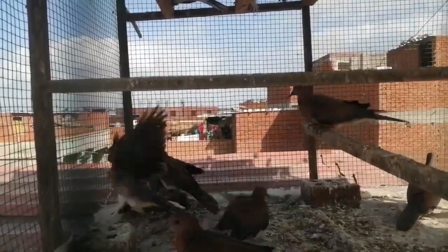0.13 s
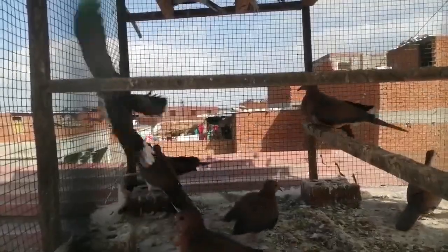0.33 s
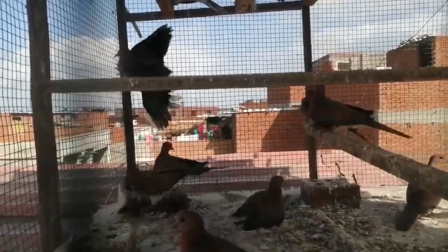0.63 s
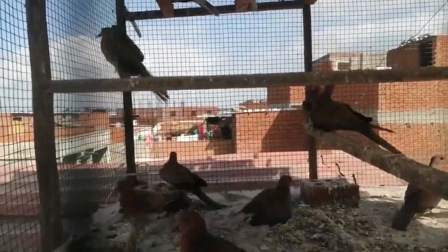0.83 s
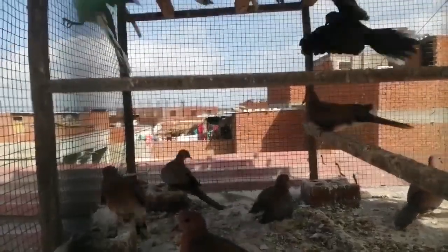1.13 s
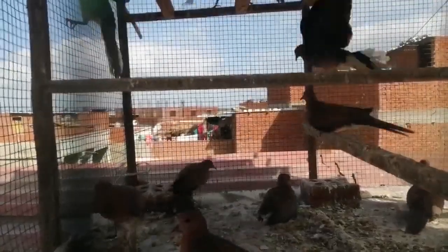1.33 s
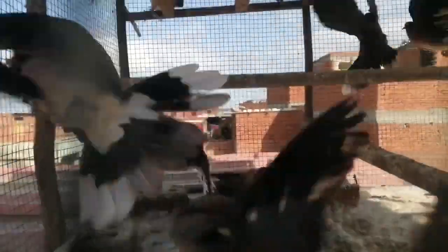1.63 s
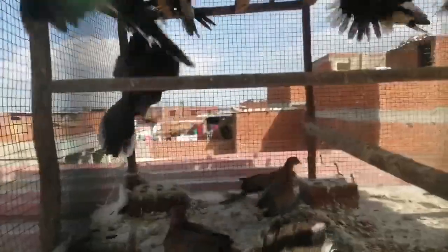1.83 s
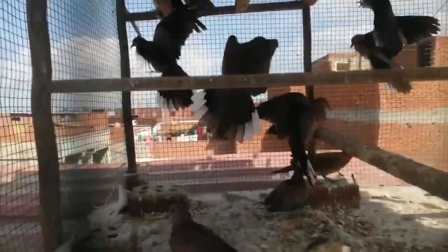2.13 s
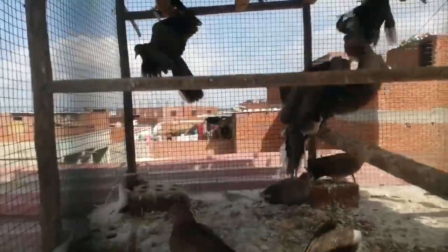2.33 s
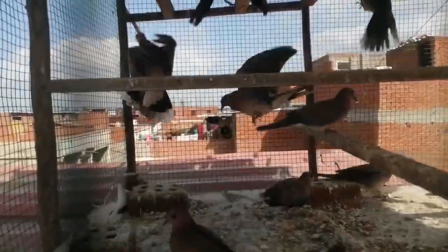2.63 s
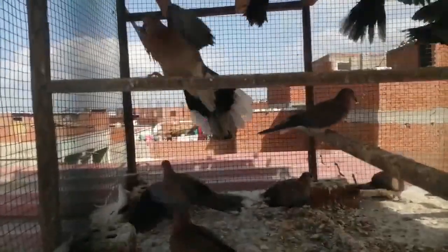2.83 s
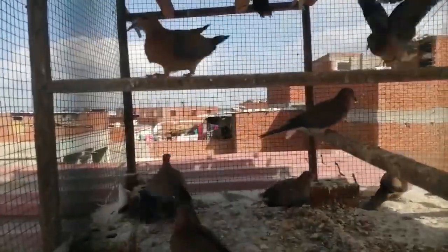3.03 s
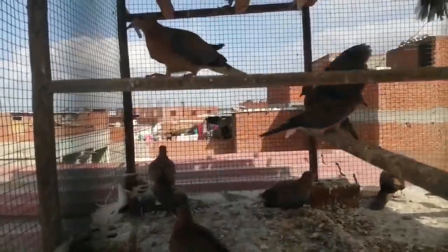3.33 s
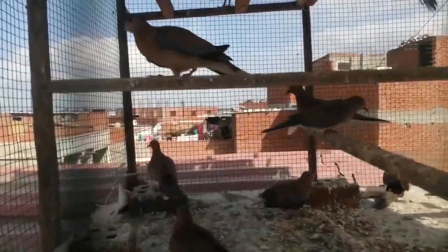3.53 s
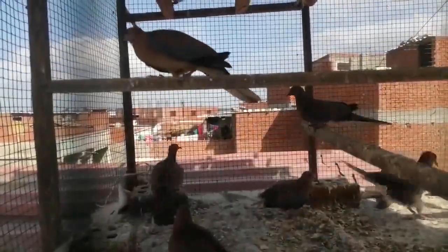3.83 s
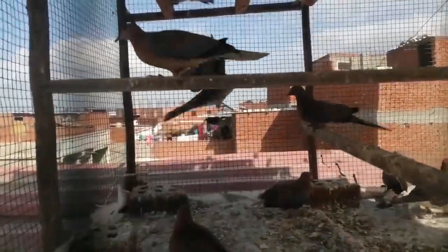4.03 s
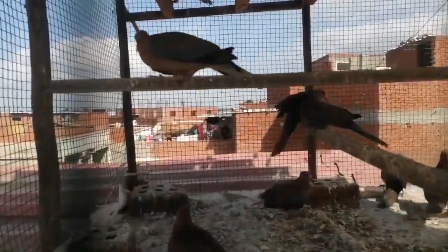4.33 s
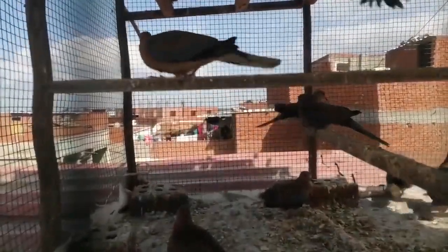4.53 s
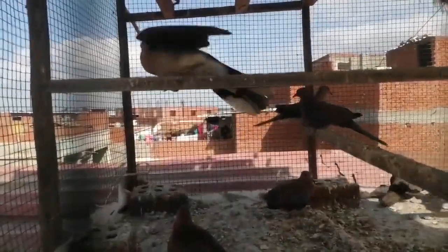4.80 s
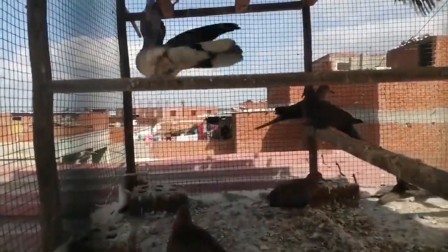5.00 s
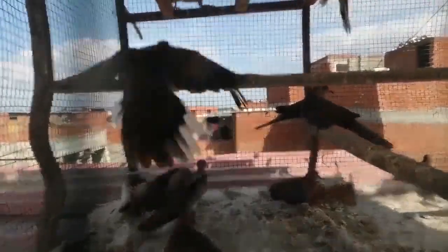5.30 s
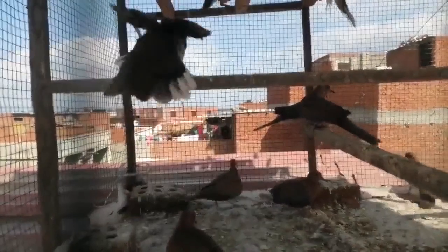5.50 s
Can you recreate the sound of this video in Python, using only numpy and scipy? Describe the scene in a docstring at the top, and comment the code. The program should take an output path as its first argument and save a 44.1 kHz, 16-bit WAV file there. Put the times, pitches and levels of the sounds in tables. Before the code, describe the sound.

Doves flap their wings close by in bursts, with sharp wing claps, feet knocking on wooden perches and air buffeting the microphone.

```python
"""A rooftop dove aviary, heard from a phone with two microphone ports among the birds. Further off,
more wings rustle over a faint town hum. Close by, wings beat from the start, each stroke a puff of
feather hiss over a duller whoosh, and the downwash buffets each port on its own. After a second comes
a flurry, with wing tips clapping. From two seconds on, feet knock the wooden perches between the
strokes. A second flurry of claps comes near five seconds, then the wings die down."""
import sys
import numpy as np
from scipy import signal
from scipy.fft import rfft, irfft, next_fast_len
from scipy.io import wavfile
from scipy.ndimage import uniform_filter1d, map_coordinates

SR = 44100
rng = np.random.default_rng(int(sys.argv[2]) if len(sys.argv) > 2 else 0)


def file_out(sig):
    """Save sig as 16-bit WAV at sys.argv[1]."""
    # one column per channel
    cols = np.atleast_2d(sig).T
    # limit, then scale
    lim = np.clip(cols, -1, 1)
    pcm = np.round(lim * 32767).astype(np.int16)
    wavfile.write(sys.argv[1], SR, pcm)


N = 249606


def amp(db):
    """Decibels to gain."""
    return 10 ** (np.asarray(db) / 20)


def unit(x):
    """Scaled to rms 1."""
    return x / np.sqrt(np.mean(x ** 2) + 1e-20)


def along(points, hz):
    """A curve through (Hz, value) points on a log frequency axis, read at hz."""
    knots_hz, values = np.transpose(points)
    return np.interp(np.log(hz + 1), np.log(knots_hz + 1), values)


def sides(pan_db):
    """Left and right gains at constant power, the left pan_db above the right."""
    left_share = 1 / (1 + amp(-2 * np.asarray(pan_db)))
    return np.sqrt(2 * np.array([left_share, 1 - left_share]))


def wobble(rate):
    """A smooth random curve, rate knots a second."""
    knots = rng.standard_normal(int(N * rate / SR) + 4)
    return map_coordinates(knots, [np.arange(N) * rate / SR])


def filtered(x, response):
    """x through a filter whose gain is response(hz)."""
    size = next_fast_len(N + 8192)
    hz = np.fft.rfftfreq(size, 1 / SR)
    return irfft(rfft(x, size) * response(hz), size)[..., :N]


# How alike the two ports hear a noise. Each row: frequency in Hz, left-right correlation.
PORT_LIKENESS = [(130, 0.38), (290, 0.54), (640, 0.38), (1400, 0.0063), (11000, 0.0087), (15000, 0.19)]

def rush(spectrum, patchy_db, likeness=PORT_LIKENESS):
    """Stereo noise of rms 1 with the given spectrum, its level patchy in time and frequency."""
    def mid_side_gains(hz):
        angle = np.arccos(np.clip(along(likeness, hz), -1, 1)) / 2
        return amp(along(spectrum, hz)) * [np.cos(angle), np.sin(angle)]

    cells = signal.stft(rng.standard_normal((2, N)), nperseg=256)[2]
    patches = uniform_filter1d(rng.standard_normal(cells.shape[1:]), size=3, axis=0)
    patches = unit(uniform_filter1d(patches, size=12, axis=1))
    pair = signal.istft(cells * amp(patchy_db * patches), nperseg=256)[1][:, :N]
    mid, side = filtered(pair, mid_side_gains)
    return unit(np.array([mid + side, mid - side]))


# Wings further off, over a faint town hum. Each row: frequency in Hz, relative level in dB.
FAR_FLOCK_SPECTRUM = [(59, -32), (100, -33), (331, 3), (670, -3.5), (1240, -7), (3940, -10.5), (15100, -13),
                      (16500, -32)]
# Those far birds stirring and settling. Each row: time in seconds, level in dB.
FAR_FLOCK_LEVELS = [(0.0, -38), (0.45, -44), (0.77, -43), (0.99, -37), (1.28, -47.5), (1.59, -35),
                    (1.7, -38.5), (2.24, -43), (2.6, -36.5), (3.2, -44.5), (3.61, -39.5), (4.1, -37.5),
                    (5.66, -40)]

def far_flock():
    """Wings rustling further off merge into one rush, swelling and fading over a faint town hum."""
    level_db = np.interp(np.arange(N) / SR, *np.transpose(FAR_FLOCK_LEVELS))
    return amp(level_db) * rush(FAR_FLOCK_SPECTRUM, patchy_db=3.5)


# Wing wind right on the microphone. Each row: time in seconds, level in dB, left over right in dB.
BUFFET_LEVELS = [(0.0, -37, 11), (0.5, -40, 2.5), (1.07, -34, 12), (1.4, -36, 8), (1.75, -34, 0.6),
                 (2.43, -39, 1), (3.15, -38, 9), (3.31, -35.5, 13), (3.48, -35, 0.6), (3.69, -32, 16),
                 (3.94, -37.5, -1), (4.4, -37.5, 0), (4.78, -45, 0), (5.28, -36, -5), (5.66, -46.5, 5)]
# Its rumble in the ports. Each row: frequency in Hz, relative level in dB.
BUFFET_SPECTRUM = [(12, -7.5), (28, -6.5), (65, -0.5), (130, -4), (300, -14), (550, -55)]
# Eddies off a wing that strike one port. Each row: centre in seconds, level in dB, swing in Hz, port.
EDDIES = [(0.229, -24.5, 93, "left"), (0.849, -22, 114, "left"), (0.868, -25, 125, "left"),
          (0.941, -20, 134, "left"), (0.967, -33, 130, "left"), (1.014, -24.5, 142, "left"),
          (1.458, -16, 55.6, "right"), (1.548, -16, 56.7, "right"), (1.887, -16, 172, "right"),
          (1.931, -32, 123, "left"), (2.141, -22.5, 112, "left"), (2.216, -22, 100, "left"),
          (2.276, -33, 96, "left"), (2.872, -29, 148, "left"), (3.005, -27, 173, "left"),
          (3.202, -26.5, 108, "left"), (3.241, -32, 95, "left"), (3.269, -29, 129, "left"),
          (3.327, -28, 125, "left"), (5.081, -27, 107, "left"), (5.35, -19, 160, "left")]

def downwash(eddy_width_cycles=0.54, shelter_db=19):
    """Turbulent air rocks each port in lumps; a single eddy stands out as one swing of pressure."""
    t = np.arange(N) / SR
    times, level_db, pan_db = np.transpose(BUFFET_LEVELS)
    lumps = amp(1.75 * np.array([wobble(25.14), wobble(30)]))
    turbulence = unit(lumps * rush(BUFFET_SPECTRUM, patchy_db=0, likeness=[(60, 0.26)]))
    out = amp(np.interp(t, times, level_db)) * sides(np.interp(t, times, pan_db)) * turbulence
    for at, db, swing_hz, port in EDDIES:
        near = slice(max(round((at - 0.05) * SR), 0), round((at + 0.05) * SR))
        cycles = (t[near] - at) * swing_hz
        envelope = np.exp(-(cycles / eddy_width_cycles) ** 2 / 2)
        eddy = np.sin(2 * np.pi * cycles) * envelope  # suction, then pressure
        wake = amp(-15.5) * np.hanning(len(cycles)) * turbulence[:, near]
        place = sides(shelter_db if port == "left" else -shelter_db)  # the other port is sheltered
        out[:, near] += amp(db) * place[:, None] * (eddy + wake)
    return out


# The modes of a wooden perch. Each row: frequency in Hz, level in dB, seconds to fall by 60 dB.
PERCH_MODES = [(220, 4.5, 0.025), (414, 0.5, 0.036), (649, -4.5, 0.11), (1040, -3.5, 0.051),
               (1447, 0.5, 0.051), (2160, -16, .03)]
# Birds landing to the right of the microphone.
# Each row: start in seconds, knock level in dB, pitch of the spot struck in Hz, claw level in dB.
PERCH_LANDINGS = [(2.098, -21.5, 650, -22.5), (2.308, -33, 800, -21), (2.743, -27, 1190, -22),
                  (3.166, -25, 460, -31), (3.402, -19, 215, -31.5), (3.775, -20, 317, -26),
                  (3.892, -44, 990, -27), (4.478, -30, 514, -23)]

def landings(mode_spread=0.34):
    """Claws tick and feet knock the wood; each spot struck favours the modes near its own pitch."""
    out = np.zeros(N + SR)
    t = np.arange(SR // 5) / SR
    for start, knock_db, spot_hz, claw_db in PERCH_LANDINGS:
        knock = np.zeros(len(t))
        for hz, mode_db, t60 in PERCH_MODES:
            nearness = 1 / (1 + (np.log(hz / spot_hz) / mode_spread) ** 2)
            decay = amp(mode_db + rng.normal(0, 1) - 60 * t / t60)
            knock += nearness * decay * np.sin(2 * np.pi * hz * t)
        tick = uniform_filter1d(rng.standard_normal(len(t)), size=12) * amp(-60 * t / 0.036)
        tick /= np.abs(tick).max()
        out[round(start * SR):][:len(t)] += amp(knock_db) * knock + amp(claw_db) * tick
    return out[:N] * sides(-4.6)[:, None]


# The air pocket between two wings. Each row: its pitch in Hz, its ring relative to the noise in dB.
POCKET_RING = [(800, -2), (1900, -2.5), (3500, -3.5), (7000, -4), (12000, -4.5)]
# Wing tips meeting or brushing the mesh, close by. Each row: peak time in seconds, level in dB,
# rise in ms, fall in ms, pitch of the air pocket in Hz, left over right in dB.
WING_CLAPS = [(0.378, -32, 1, 4.6, 1500, 2), (0.4385, -29, 1.2, 2.5, 8900, 6),
              (1.0134, -14.5, 4.2, 4, 1620, 4), (1.211, -18, 1.8, 6.2, 790, 4),
              (1.298, -23, 1.5, 6.1, 2000, -5), (1.4596, -20, 2.7, 2.9, 13600, -13),
              (1.509, -19, 2.4, 2.2, 4220, 1), (1.5676, -7, 0.81, 1.6, 1000, -18),
              (1.6126, -16.5, 2.4, 3.7, 1800, 0.3), (1.736, -14, 1.9, 3.2, 1410, -10),
              (1.8172, -19, 3.7, 3.7, 1880, -7), (1.886, -21.5, 5, 3.6, 10000, 2.2),
              (2.4617, -18, 1.8, 2.6, 1980, -8), (2.5395, -18.5, 1.4, 1.9, 3220, -5),
              (3.927, -21, 1.9, 4, 6600, 5), (3.973, -30, 1.2, 8, 2000, 1), (4.097, -10, 5, 3.6, 1875, 2.5),
              (4.3075, -12.5, 5.7, 4.8, 2180, 4), (4.522, -14.5, 1.8, 1.6, 8400, 17),
              (4.613, -25, 3, 4.1, 10800, 8), (4.7033, -24, 3, 2.5, 10800, 9),
              (4.823, -13.5, 5.3, 1.9, 11150, 16), (4.9, -14.5, 4.2, 18, 3540, 2),
              (4.9181, -8, 5.3, 3.7, 6430, 1.5), (5.006, -10, 1.3, 1.5, 1570, 0.5),
              (5.0346, -14, 1.4, 11, 2010, -7), (5.05, -9, 3.4, 2.2, 8670, 3),
              (5.111, -9.5, 1.5, 2.7, 10600, 4), (5.4582, -18, 1.1, 0.92, 1940, -9),
              (5.5885, -24.5, 1.6, 2.4, 990, -2)]

def claps(drift_radians=0.205):
    """A brief crack, different at each port, coloured by the pocket of air between the wings."""
    out = np.zeros((2, N + SR))
    lead = SR // 50  # samples before the peak
    ms = np.arange(-lead, SR // 25) * 1000 / SR
    for at, db, rise_ms, fall_ms, pocket_hz, pan_db in WING_CLAPS:
        shape_db = np.where(ms < 0, -6 * np.abs(ms / rise_ms) ** 3.1, -5 * ms / fall_ms)
        ring_gain = amp(along(POCKET_RING, pocket_hz))
        drift = np.cumsum(rng.normal(0, drift_radians, (2, len(ms))), axis=1)  # the pocket changes shape
        ring = ring_gain * np.sin(2 * np.pi * pocket_hz * ms / 1000 + drift)
        crack = (rng.standard_normal((2, len(ms))) + ring) / np.sqrt(1 + ring_gain ** 2 / 2)
        out[:, round(at * SR):][:, :len(ms)] += sides(pan_db)[:, None] * amp(db - 9.5 + shape_db) * crack
    brightening = [(200, -3), (800, 0), (7000, 6.0), (16000, 4.5)]  # (Hz, dB)
    return filtered(out[:, lead:lead + N], lambda hz: amp(along(brightening, hz)))


# A wing at close range: feather hiss, the high sheen on it, and the whoosh of pushed air.
# Each row: frequency in Hz, relative level in dB.
HISS_SPECTRUM = [(700, -33), (1500, -3.5), (3000, -5), (5000, -7), (7000, -6.5), (10000, -12.5)]
SHEEN_SPECTRUM = [(4500, -54), (7000, -1.5), (9000, 3.5), (12500, -1.5), (15300, 0.5), (17000, -6)]
WHOOSH_SPECTRUM = [(150, -5.5), (330, -2.5), (750, -3), (1200, -7), (1700, -13), (3000, -23.5)]
# Where the birds fly, as heard from the phone. Each row: time in seconds, left over right in dB.
FLOCK_POSITION = [(0.1, 1.5), (0.6, 3), (1.05, -2), (1.42, 1), (1.62, 1), (1.95, -1.5), (2.16, 3),
                  (2.3, -2), (2.55, 0), (2.95, -4.5), (3.45, -0.3), (3.68, 5), (3.85, 0), (4.0, 2.5),
                  (4.2, 1.2), (4.7, 3), (4.95, -1), (5.4, 5)]
# Wingbeats around the microphone.
# Each row: peak time in seconds, hiss level in dB, length in ms, whoosh relative to hiss in dB.
WING_STROKES = [(0.11, -37.5, 48, -13), (0.182, -35.5, 53, -3.5), (0.307, -38, 20, -6),
                (0.389, -31.5, 24.5, 2), (0.48, -32, 33, 0), (0.578, -39.5, 13, 3), (0.759, -38.5, 18, 1.5),
                (0.832, -30.5, 29, -1), (0.87, -42.5, 40, 9.5), (0.925, -30.5, 18, 1),
                (0.966, -25.5, 18.5, -1), (1.011, -24, 26, -5), (1.051, -32.5, 7.7, -1),
                (1.09, -35, 9.6, -2), (1.179, -33.5, 41, -2), (1.215, -22, 12.7, -4),
                (1.308, -33, 35, -0.5), (1.395, -30, 26, 3), (1.455, -27.5, 67, -2), (1.513, -24, 32, 1),
                (1.58, -19, 48, 1.5), (1.618, -26.5, 44, 8.5), (1.67, -22.5, 33, 1.5),
                (1.747, -21.5, 41, -2.5), (1.822, -31, 41, 1.5), (1.886, -31.5, 28, -7),
                (1.914, -26.5, 29, -2.5), (1.998, -25, 24.7, 0), (2.102, -41, 31, 7), (2.155, -36, 60, -3),
                (2.228, -36.5, 34, -4.5), (2.31, -36, 79, -3), (2.357, -41, 38, 1),
                (2.412, -25.5, 22.5, -2.5), (2.47, -34.5, 55, 0), (2.539, -36, 23, 4.5),
                (2.577, -26.5, 21, -6.5), (2.63, -37, 96, 0.5), (2.692, -32.5, 47, -3),
                (2.754, -34.5, 52, -2.5), (2.857, -41.5, 97, 1.5), (2.946, -34, 16, -1.5),
                (3.045, -37, 30, 0.5), (3.14, -43.5, 79, 2.5), (3.254, -37.5, 15, -3),
                (3.441, -37, 18, 7.5), (3.504, -28, 43, -2.5), (3.548, -30, 52, -6.5),
                (3.619, -33.5, 42, -1.5), (3.685, -35.5, 61, -13), (3.781, -25, 32, -5),
                (3.839, -29.5, 25, -1.5), (3.928, -29.5, 12, -1), (3.985, -23.5, 15, -3.5),
                (4.004, -24.5, 28, -3.5), (4.102, -33.5, 39, -0.5), (4.19, -30, 25, 2.5),
                (4.266, -40, 14, 4), (4.314, -28.5, 41, 1), (4.422, -25, 28, -3), (4.515, -27, 46, -1),
                (4.59, -36, 63, -2), (4.695, -31, 31, -6.5), (4.752, -39, 44, 0), (4.82, -26.5, 27, -4),
                (4.918, -20.5, 20.3, -2), (5.047, -21, 22.7, -6), (5.09, -33.5, 30, 1),
                (5.135, -30.5, 53, -2), (5.268, -29, 39, -2.5), (5.37, -45.5, 120, 3)]

def wing_strokes(rise_share=0.49, sharpness=1.13, air_drag=1.045, dulling=0.72):
    """Air over the feathers swells to a point and dies away; overlapping strokes add their power."""
    power = np.zeros((3, 2, N + SR))  # layer, port, sample
    lead = SR // 5  # samples before the peak
    ms = np.arange(-lead, lead) * 1000 / SR
    for at, db, length_ms, whoosh_db in WING_STROKES:
        slope_ms = np.clip(length_ms * np.where(ms < 0, rise_share, 1 - rise_share), 2, 90)
        from_peak = np.abs(ms) / slope_ms
        feathers = amp(db - 3 - 5.58 * from_peak ** sharpness)
        pushed_air = amp(db + whoosh_db - 5.02 * (from_peak / air_drag) ** sharpness)  # lasts longer
        sheen_db = -6 - dulling * whoosh_db  # a stroke that pushes more air sounds duller
        layers = np.array([feathers * amp(-sheen_db / 2), feathers * amp(sheen_db / 2), pushed_air])
        place = sides(np.interp(at, *np.transpose(FLOCK_POSITION)))
        power[:, :, round(at * SR):][..., :len(ms)] += (layers[:, None] * place[:, None]) ** 2
    hiss_gain, sheen_gain, whoosh_gain = np.sqrt(power[..., lead:lead + N])
    rustle = amp(1.66 * wobble(120) + 1.7 * wobble(500))  # feathers slide over each other in fits
    hiss = hiss_gain * rush(HISS_SPECTRUM, patchy_db=3.0)
    sheen = amp(0.26) * sheen_gain * rush(SHEEN_SPECTRUM, patchy_db=3.5)
    whoosh = amp(-1.52) * whoosh_gain * rush(WHOOSH_SPECTRUM, patchy_db=2.5)
    return amp(-0.76) * rustle * (hiss + sheen) + whoosh


def scene():
    """The birds further off, the doves close by and their wind on the microphone."""
    return far_flock() + wing_strokes() + claps() + landings() + downwash()


def record(dry):
    """The phone's left port hears more top, the right more middle; nothing passes the band limit."""
    band_limit_hz = 16000
    # Each pair: frequency in Hz, left over right in dB.
    tilt = [(400, 0.5), (1500, -2.5), (2500, -2), (4400, -1.0), (8100, 5.5), (15000, -1.0)]
    return filtered(dry, lambda hz: sides(along(tilt, hz)) * (hz < band_limit_hz))


dry = scene()
out = record(dry)
file_out(out)
```